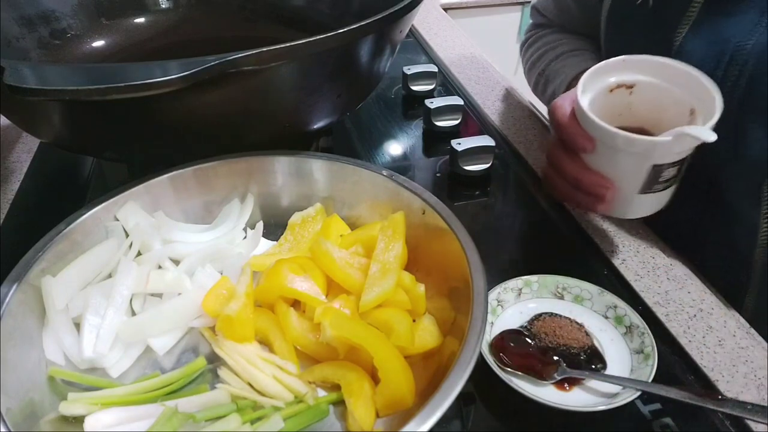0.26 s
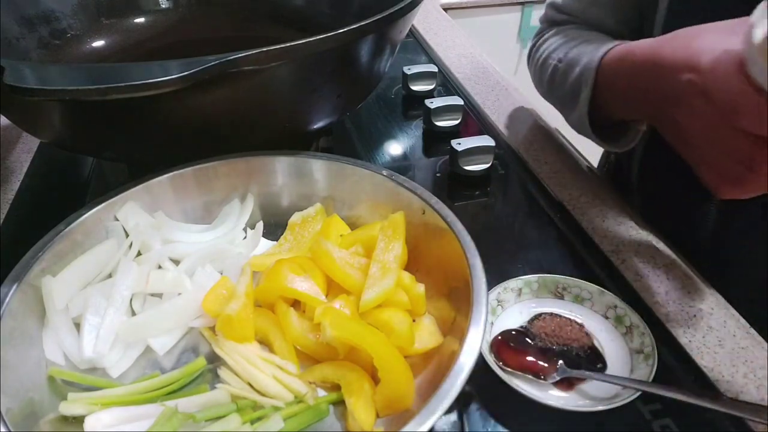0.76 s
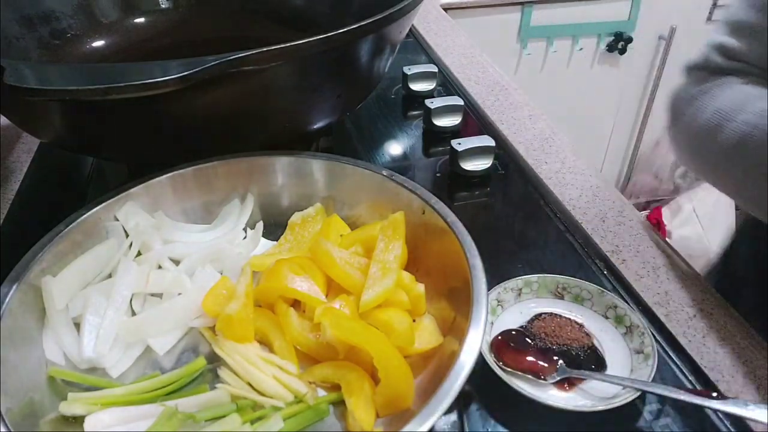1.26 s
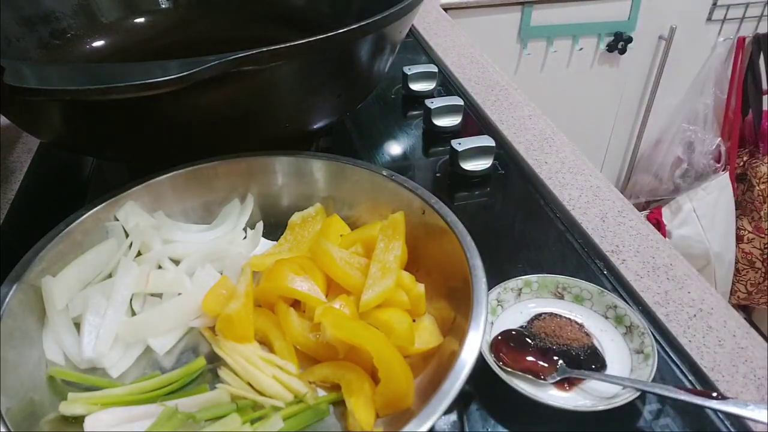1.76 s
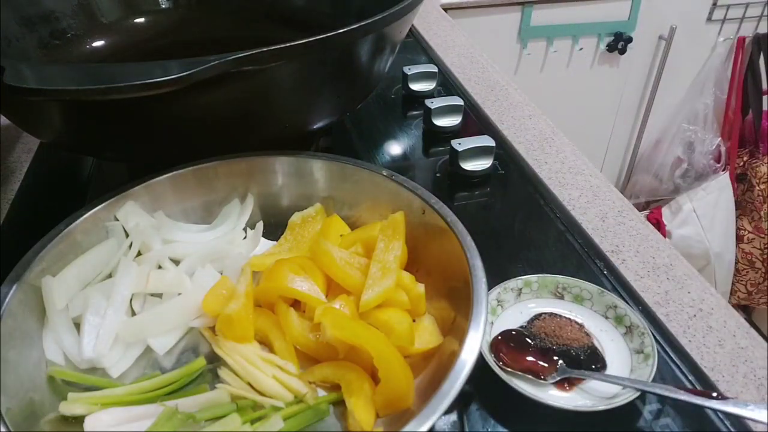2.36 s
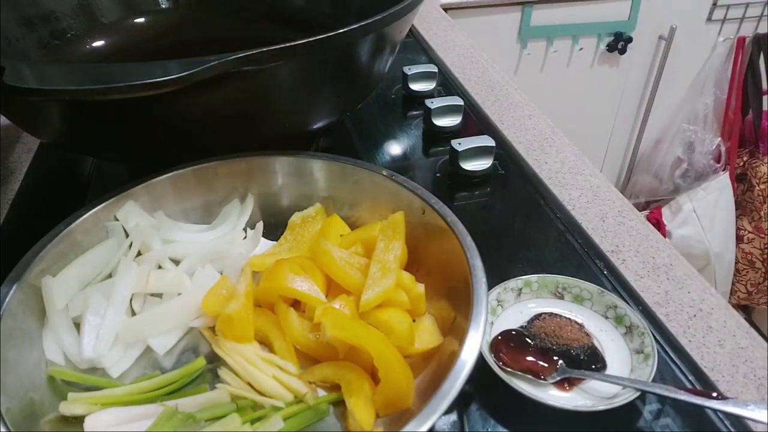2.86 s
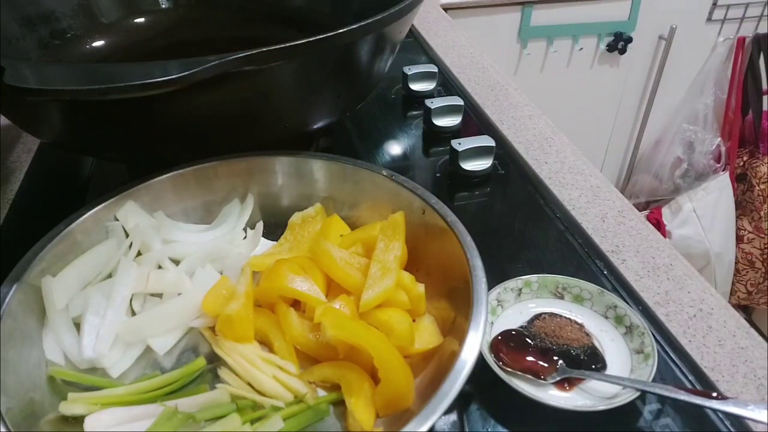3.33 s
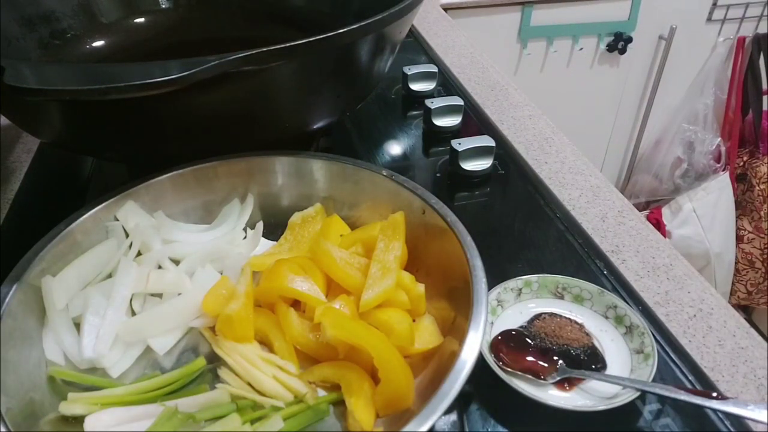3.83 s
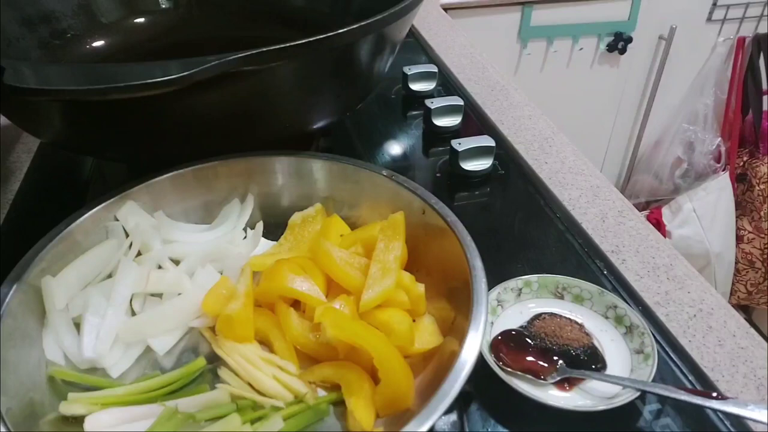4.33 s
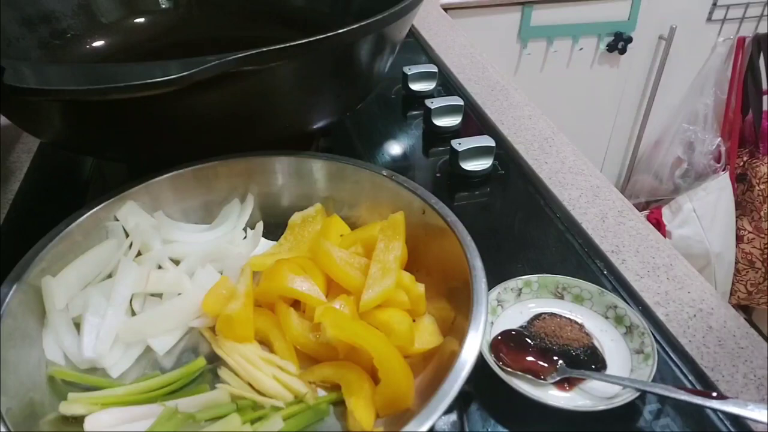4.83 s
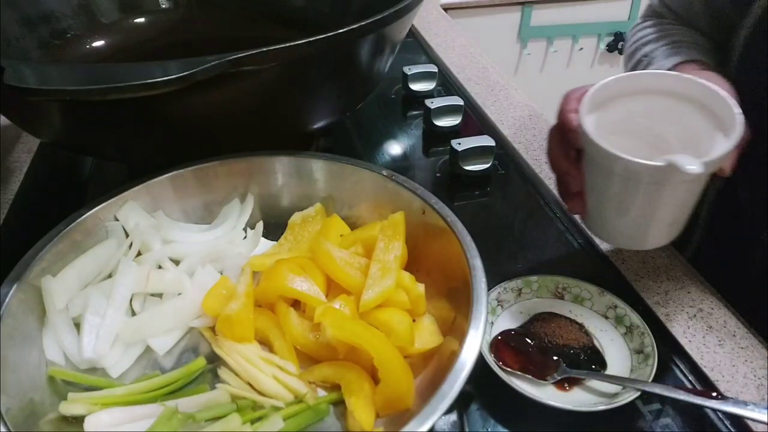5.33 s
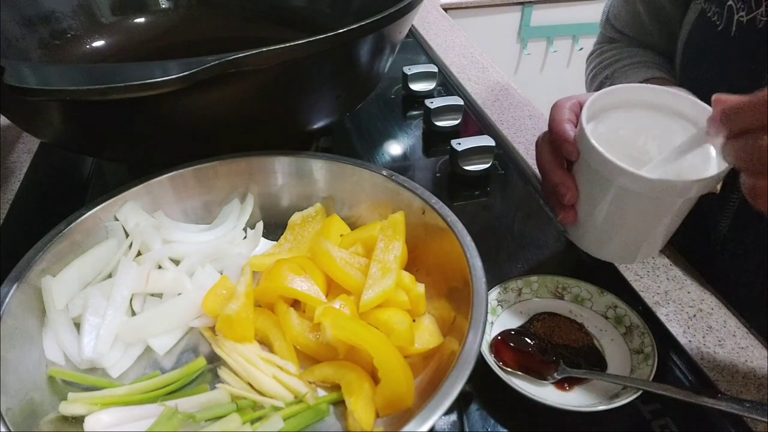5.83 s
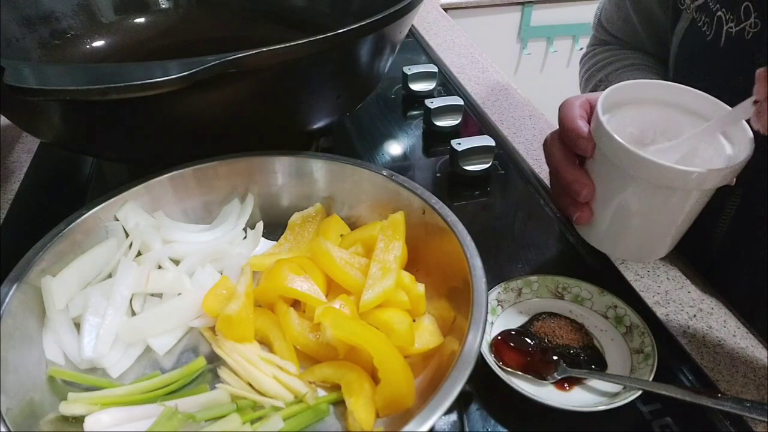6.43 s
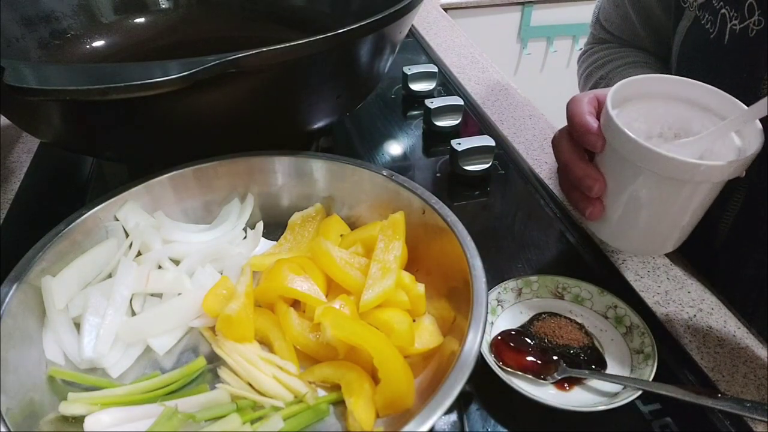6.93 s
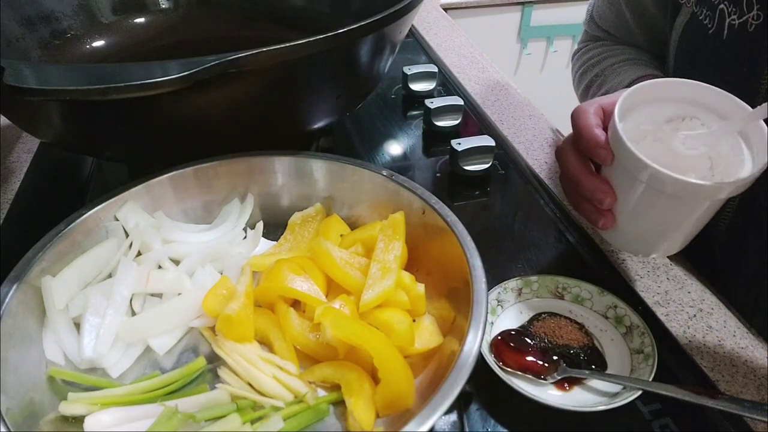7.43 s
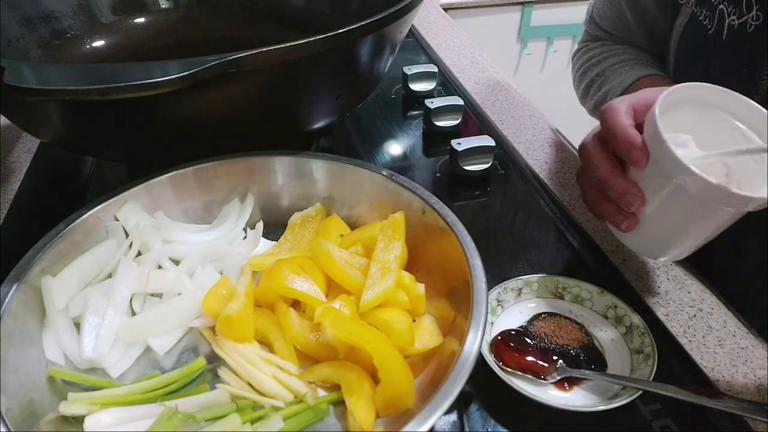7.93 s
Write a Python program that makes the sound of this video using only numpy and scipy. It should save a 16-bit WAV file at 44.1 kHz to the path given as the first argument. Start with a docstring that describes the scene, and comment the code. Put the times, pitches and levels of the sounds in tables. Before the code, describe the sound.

A spoon taps brightly on a cup's rim, then cups clack and containers thud and slide on a kitchen worktop over a faint hum.

```python
"""A spoon taps twice on the rim of a cup, bright and ringing, as seasoning is portioned out in a small kitchen.
Cups and lids clack, containers thud and slide on the worktop, and the spoon scrapes and clicks in a tub.
Each hit is a noisy crack, a few ringing modes and a hollow air note; each slide is a grainy swell of noise.
Close, hard walls add short echoes, and a kitchen appliance hums faintly underneath."""
import sys
import numpy as np
from scipy import signal
from scipy.fft import rfft, irfft, next_fast_len
from scipy.io import wavfile
from scipy.ndimage import uniform_filter1d

SR = 44100
rng = np.random.default_rng(int(sys.argv[2]) if len(sys.argv) > 2 else 0)


def master(y):
    """Save y as 16-bit WAV."""
    cut = np.clip(np.atleast_2d(y).T, -1, 1)
    pcm = np.round(cut * 32767)  # scale
    wavfile.write(sys.argv[1], SR, pcm.astype(np.int16))


N = 361161
RING = int(.6 * SR)  # samples in one hit or room tail
BASS_HZ, TREBLE_HZ = 1500, 6000  # a hit's level is the peak of its mids, between these two
FIRM_DB = -22  # level of a firm hit

# The appliance's rush of air and its thin whine: (frequency [Hz], gain [dB])
AIR_COLOUR = [(22, -29.5), (48, -17), (65, -5), (140, 1.5), (215, -22.5), (290, -8.5), (540, -23.5),
              (760, -21), (1100, -29.5), (1500, -31.5), (1950, -46.5), (5200, -45.5), (6800, -48.5),
              (11500, -44.5), (15500, -46.5)]
WHINE_COLOUR = [(6500, -50.5), (7900, -21.5), (8250, 1.5), (8750, -3.5), (9200, -23), (11000, -50)]
# Motor and mains tones, ahead of the fader: (frequency [Hz], level [dB])
HUM_TONES = [(62, -54.5), (100, -51.5), (128, -52.5), (150, -55), (268, -67.5), (328, -56), (404, -64),
             (489, -65.5), (756, -75)]
# The whine, ahead of the fader: (time [s], level [dB])
WHINE_LEVEL = [(5.4, -78.5), (5.7, -79.5)]
# Level of the whole background bed over time, rising a few dB: (time [s], gain [dB])
APPLIANCE_FADER = [(1.0, -3.5), (2.6, -1.5), (4.0, -0.6)]

# Friction: surface hiss, a sliding body's rumble, a scrape's narrow ring: (frequency [Hz], gain [dB])
HISS_COLOUR = [(300, -21), (1500, -9.5), (4200, 2.5), (6800, -2.5), (10000, 2.5), (13500, 3),
               (15500, -14.5)]
RUMBLE_COLOUR = [(60, -11.5), (300, 10), (550, 5), (750, -2.5), (1300, -7.5), (2500, -12.5), (6000, -26)]
SCRAPE_COLOUR = [(1000, -33), (2600, -14), (3020, 9), (3400, -17), (6000, -23)]
# Things slide over the worktop: (start [s], length [s], dry hiss level [dB])
SLIDES = [(0.358, 0.032, -51.5), (2.215, 0.046, -62), (2.585, 0.032, -54), (2.807, 0.1, -65),
          (3.029, 0.022, -50), (3.185, 0.06, -57.5), (3.915, 0.29, -54.5), (4.33, 0.16, -68.5),
          (4.542, 0.3, -64.5), (4.873, 0.53, -73.5), (5.48, 0.062, -56)]
# The spoon scrapes a vessel's wall: (start [s], length [s], dry ring level [dB])
SCRAPES = [(0.471, 0.2, -62.5), (0.745, 0.044, -70), (3.97, 0.31, -74), (7.209, 0.056, -62.5)]

# The modes each object rings with: (frequency [Hz], gain [dB], t60 [s])
TUB_MODES = [(2950, 0, .08), (3020, -3, .04), (7880, -16, .03), (9520, -21, .035), (11000, -30, .04),
             (14750, -25, .03)]
WORKTOP_MODES = [(75, -9, 0.38), (263, -12, 0.053), (312, 6.5, 0.13), (421, 2, 0.077), (751, -6.5, 0.035),
                 (824, -13, .06), (940, -7, 0.2), (1506, -7, 0.065), (1740, -44.5, .06)]
CUP_MODES = [(1238, -10, .07), (2150, -9, .05), (2980, -3, .05), (3130, -1, .07), (4834, -10, .08),
             (8050, -12, .06), (8300, -14, .07), (9610, -12, .1), (10910, -4, .04), (11500, -9, .04),
             (12720, -13, .06), (13970, -12, .04)]
SPOON_MODES = [(1863, -35, .16), (2970, -9, .06), (3035, -2, .11), (4846, 1, .15), (7205, -14, .12),
               (8170, -18, .11), (9598, -11, .15), (10735, -6, .12), (10870, -9, .07), (11120, -11, .09),
               (11620, -16, .12), (12690, -13, .16), (14215, -9, .09), (14815, -10, .14)]
# The colour of each contact's crack: (frequency [Hz], gain [dB])
TUB_CRACK = [(200, -9.5), (700, -2), (1700, 8), (2400, -2), (3000, -4.5), (3700, 1.5), (5500, 1),
             (7600, -3), (8700, -16), (11000, -11.5), (15000, -45)]
WORKTOP_CRACK = [(60, -24.5), (150, -4.5), (280, 8), (560, 0), (850, 5), (1700, -7), (2500, -20.5),
                 (3200, -22), (3700, -31), (4500, -34.5), (7000, -39), (11000, -24.5), (15000, -37.5)]
CUP_CRACK = [(120, -20), (250, -8), (500, 2.5), (850, 11.5), (1700, -1.5), (2500, -8.5), (3200, -4),
             (4500, -10.5), (6500, -12), (9000, -3.5), (11300, -1.5), (15000, -10.5)]
RIM_CRACK = [(150, -19), (900, -9.5), (2000, -13.5), (3100, 3), (4300, -6), (6200, -16), (9000, -9),
             (11000, -5), (13000, -4.5), (15000, -0.5)]

# The spoon clicks in the tub: (time [s], level [dB], bass against mids [dB])
TUB_CLICKS = [(3.9539, -33, -11.5), (4.7093, -31, -2), (7.381, -24, -14.5), (8.0534, -47, 0)]
# Containers land on the worktop: (time [s], level [dB], treble against mids [dB], hollow note [Hz])
THUMPS = [(2.4985, -74, -3.5, 530), (2.622, -17.5, -27, 780), (2.6337, -29, -2.5, 715),
          (2.8292, -76, -9, 660), (3.0374, -65.5, 8.5, 550), (3.1962, -60, 11.5, 770),
          (3.6956, -19, -31, 880), (4.5638, -65.5, 7, 646), (4.6153, -69.5, 3, 497)]
# Cups and lids knock together: (time [s], level [dB], bass against mids [dB])
CUP_KNOCKS = [(0.3731, -32.5, -5), (0.428, -41.5, -8), (0.867, -39, 5), (0.9306, -49.5, -23),
              (1.105, -38.5, 7.5), (1.1274, -42, 6), (1.1695, -46, -4), (1.2421, -64, 24.5),
              (1.2808, -26, 0.5), (1.2906, -18.5, 1), (1.503, -22.5, -2), (1.751, -40.5, 7.5),
              (4.095, -30.5, -3), (4.7795, -44, 9)]
# The hollow note falls as the cup is covered; the clacks are brightest near 1.3 s and duller before
# and after: (time [s], hollow note [Hz], treble against mids [dB])
CUP_TONE = [(0.38, 860, -16), (0.867, 1025, -7), (1.17, 730, -2), (1.26, 549, 1.5), (1.75, 450, -8.5),
            (4.1, 719, -15)]
# The spoon taps the rim: (time [s], level [dB], gap to the bounce [s])
RIM_TAPS = [(0.0084, -18, 0.014), (0.093, -17.5, 0.02)]


def undb(db):
    """Decibels to gain."""
    return 10 ** (np.asarray(db) / 20)


def decay(t60):
    """An exponential fade that loses 60 dB in t60 seconds."""
    return np.exp(-np.log(1000) * np.arange(RING) / SR / t60)


def unit(x):
    """Scale stereo to an average energy of one per channel."""
    return x / np.sqrt(np.sum(x ** 2) / 2)


def at_rms(x, db):
    """Scale to an rms level."""
    return x * undb(db) / np.sqrt(np.mean(x ** 2))


def panned(x, db):
    """Tilt the balance to the left by db."""
    return x * undb(np.array([[db], [-db]]) / 2)


def add(out, x, time_s):
    """Mix x into out from time_s on."""
    start = max(int(time_s * SR), 0)
    out[:, start:start + x.shape[1]] += x[:, :N - start]


def coloured(x, points):
    """Minimum-phase EQ through (frequency [Hz], gain [dB]) points."""
    n = next_fast_len(x.shape[1] + RING // 8, True)
    hz, db = np.transpose(points)
    log_hz = np.log(np.maximum(np.arange(n // 2 + 1) * SR / n, 1))
    gain = undb(np.interp(log_hz, np.log(hz), db))
    cepstrum = irfft(np.log(gain), n)
    cepstrum[1:n // 2] *= 2
    cepstrum[n // 2 + 1:] = 0
    return irfft(rfft(x, n) * np.exp(rfft(cepstrum)), n)[:, :x.shape[1]]


def diffuse(n, wide_hz=750):
    """Stereo noise, centred in the bass and wide above wide_hz."""
    mid, side = rfft(rng.standard_normal((2, n)))
    hz = np.arange(len(mid)) * SR / n
    likeness = .98 / (1 + (hz / wide_hz) ** 2)
    return irfft(mid * np.sqrt(1 + likeness) + np.array([[1], [-1]]) * side * np.sqrt(1 - likeness), n)


def wander(rate_hz, n):
    """Random values joined by ramps, rate_hz of them a second."""
    step = max(int(SR / rate_hz), 1)
    return uniform_filter1d(np.repeat(rng.standard_normal(n // step + 1), step), step)[:n]


def kitchen(x, wet_db, near_t60=.22, build_s=.0015, late_db=-13, late_t60=.42):
    """Dry sound, dense echoes off close, hard walls, and a weak longer tail from the rest of the room."""
    near = diffuse(RING) * decay(near_t60)
    late = undb(late_db) * diffuse(RING) * decay(late_t60)
    build_up = 1 - np.exp(-(np.arange(RING) / SR / build_s) ** 2)
    echoes = unit(build_up * (near + late))
    return np.pad(x, ((0, 0), (0, RING - 1))) + undb(wet_db) * signal.fftconvolve(x, echoes, axes=1)


def ringing(modes, detune=0, split_hz=28, twin_gain=.4):
    """Damped modes that slight asymmetry splits into beating pairs; the high ones spread wide."""
    t, out = np.arange(RING) / SR, 0
    for (hz, db, t60), (shift, side, split) in zip(modes, rng.standard_normal((len(modes), 3))):
        spread = np.sign(side) * np.pi / 4 * min(hz / BASS_HZ, 1) * np.array([[1], [-1]])
        phase = 2 * np.pi * hz * (1 + detune * shift) * t + spread  # the grip shifts each mode a little
        beat = 2 * np.pi * split_hz * (np.sign(split) + split / 2) * t
        out = out + undb(db) * decay(t60) * (np.sin(phase) + twin_gain * np.sin(phase + beat))
    return unit(out)


def voiced(x, db, bass_db, treble_db, window=220):
    """A hit's force and hardness set the peak short-term level of its bass, mids and treble."""
    bass, below_treble = [signal.sosfiltfilt(signal.butter(4, hz, fs=SR, output="sos"), x, padtype=None)
                          for hz in (BASS_HZ, TREBLE_HZ)]
    out = 0
    for band, offset_db in (bass, bass_db), (below_treble - bass, 0), (x - below_treble, treble_db):
        power = uniform_filter1d(np.mean(band ** 2, axis=0), window, mode="constant")
        out = out + band * undb(db + offset_db) / np.sqrt(power.max())
    return out


def hits(events, modes, crack_colour, crack_t60, rise_s, ring_db, hollow_db, hollow_t60,
         wet_db, pan_db, left_lag_s, wide_hz, detune=.0007):
    """Each hit is a crack of many dead modes, the few that ring on and the air note of the vessel."""
    out = np.zeros((2, N))
    attack = 1 - np.exp(-np.arange(RING) / SR / rise_s)
    for time_s, db, bass_db, treble_db, hollow_hz in events:
        crack = unit(coloured(diffuse(RING, wide_hz) * decay(crack_t60), crack_colour))
        hollow = undb(hollow_db) * ringing([(hollow_hz, 0, hollow_t60)])
        knock = crack + hollow
        knock[0] = np.pad(knock[0], (int(left_lag_s * SR), 0))[:RING]
        ring = undb(ring_db) * ringing(modes, detune)
        in_room = kitchen(attack * (knock + ring), wet_db)[:, :RING]
        add(out, panned(voiced(in_room, db, bass_db, treble_db), pan_db), time_s)
    return out


def rubbing(strokes, layers, grain_db, grain_hz, wet_db, pan_db):
    """Each stroke swells and fades, catching and slipping, in noise layers of (colour, gain [dB])."""
    out = np.zeros((2, N))
    for start_s, length_s, db in strokes:
        n = int(length_s * SR)
        swell = np.sqrt(np.hanning(n)) * undb(grain_db * wander(grain_hz, n))
        friction = sum(at_rms(coloured(diffuse(n) * swell, colour), db + gain_db)
                       for colour, gain_db in layers)
        add(out, panned(kitchen(friction, wet_db), pan_db), start_s)
    return out


def appliance(waver=.81, waver_hz=7, pan_db=2):
    """The bed: wavering motor and mains tones, a low rush of air and a faint whine; the whole background rises
    slowly over the first seconds."""
    t = np.arange(N) / SR
    air = at_rms(coloured(diffuse(N, wide_hz=1068), AIR_COLOUR), db=-45)
    whine = at_rms(coloured(diffuse(N), WHINE_COLOUR), np.interp(t, *np.transpose(WHINE_LEVEL)))
    hum = 0
    for hz, db in HUM_TONES:
        sway = 1 + waver * (wander(waver_hz, N) + 1j * wander(waver_hz, N))  # in level and phase
        tone = np.exp(2j * np.pi * (hz * t + rng.random()))
        hum = hum + at_rms(np.real(sway * tone), db)
    fader = undb(np.interp(t, *np.transpose(APPLIANCE_FADER)))
    return panned(air + whine + hum, pan_db) * fader


def spoon_scrapes():
    """The spoon drags along a vessel's wall: a gritty, narrow ring with a little hiss."""
    layers = [(SCRAPE_COLOUR, 0), (HISS_COLOUR, -8)]
    return rubbing(SCRAPES, layers, grain_db=7.5, grain_hz=167, wet_db=0, pan_db=1)


def worktop_slides():
    """Things brush over the worktop: the surface hisses and the sliding body rumbles."""
    layers = [(HISS_COLOUR, 0), (RUMBLE_COLOUR, 4.5)]
    return rubbing(SLIDES, layers, grain_db=5, grain_hz=280, wet_db=1, pan_db=0)


def tub_clicks(firm_treble_db=-9.5, hollow_hz=700):
    """The spoon clicks against the tub; the lighter the click, the duller it is."""
    events = [(time_s, db, bass_db, firm_treble_db - (FIRM_DB - db), hollow_hz)
              for time_s, db, bass_db in TUB_CLICKS]
    return hits(events, TUB_MODES, TUB_CRACK, crack_t60=.018, rise_s=.00014, ring_db=14,
                hollow_db=-8, hollow_t60=.019, wet_db=-3, pan_db=.5, left_lag_s=.00043, wide_hz=2870)


def worktop_thumps(firm_bass_db=6.5, softening=.47):
    """Containers thud on the worktop; the gentler the landing, the more of it is bass."""
    events = [(time_s, db, firm_bass_db + softening * (FIRM_DB - db), treble_db, hollow_hz)
              for time_s, db, treble_db, hollow_hz in THUMPS]
    return hits(events, WORKTOP_MODES, WORKTOP_CRACK, crack_t60=.024, rise_s=.0015, ring_db=-2,
                hollow_db=3, hollow_t60=.017, wet_db=-3.5, pan_db=.8, left_lag_s=.0001, wide_hz=700)


def cup_chatter(start_s=4.145, length_s=.085, count=8, db=-50, scatter_db=2, bass_db=11.5):
    """A dragged cup skips in a run of light, uneven knocks."""
    for k, (jitter, force) in enumerate(zip(rng.random(count), rng.standard_normal(count))):
        yield start_s + length_s * (k + jitter) / count, db + scatter_db * force, bass_db


def cup_knocks():
    """Cups and lids clack, brightest near 1.3 s; the hollow note falls as the cup is covered."""
    times, note_hz, treble_db = np.transpose(CUP_TONE)
    events = [(time_s, db, bass_db, np.interp(time_s, times, treble_db), np.interp(time_s, times, note_hz))
              for time_s, db, bass_db in [*CUP_KNOCKS, *cup_chatter()]]
    return hits(events, CUP_MODES, CUP_CRACK, crack_t60=.053, rise_s=.00042, ring_db=-7.5, detune=.012,
                hollow_db=3, hollow_t60=.056, wet_db=-3.5, pan_db=-1, left_lag_s=.00043, wide_hz=3010)


def spoon_choke(touch_s=.012, depth_db=-12):
    """A gain dip just before the second tap, as the spoon comes back to the rim and chokes its ring."""
    approach = (np.arange(N) / SR - RIM_TAPS[1][0]) / touch_s
    return undb(depth_db * np.exp(-approach ** 2) * (approach < 0))


def rim_taps(bass_db=-28, treble_db=1.5, bounce_db=-4, bounce_treble_db=-2, hollow_hz=1100):
    """The spoon rings on the cup's rim, each tap followed by one softer, duller bounce."""
    events = []
    for time_s, db, gap_s in RIM_TAPS:
        events.append((time_s, db, bass_db, treble_db, hollow_hz))
        events.append((time_s + gap_s, db + bounce_db, bass_db, bounce_treble_db, hollow_hz))
    taps = hits(events, SPOON_MODES, RIM_CRACK, crack_t60=.05, rise_s=.00065, ring_db=9,
                hollow_db=-22, hollow_t60=.013, wet_db=6, pan_db=2, left_lag_s=.0001, wide_hz=812)
    return taps * spoon_choke()


def scene():
    """Hits up front, friction behind them, the appliance underneath."""
    impacts = rim_taps() + cup_knocks() + worktop_thumps() + tub_clicks()
    friction = worktop_slides() + spoon_scrapes()
    return impacts + friction + appliance()


def record(dry):
    """A steep low-pass trims the very top."""
    top_hz = 15500
    return signal.sosfilt(signal.ellip(10, .2, 80, top_hz, fs=SR, output="sos"), dry)


dry = scene()
out = record(dry)
master(out)
```